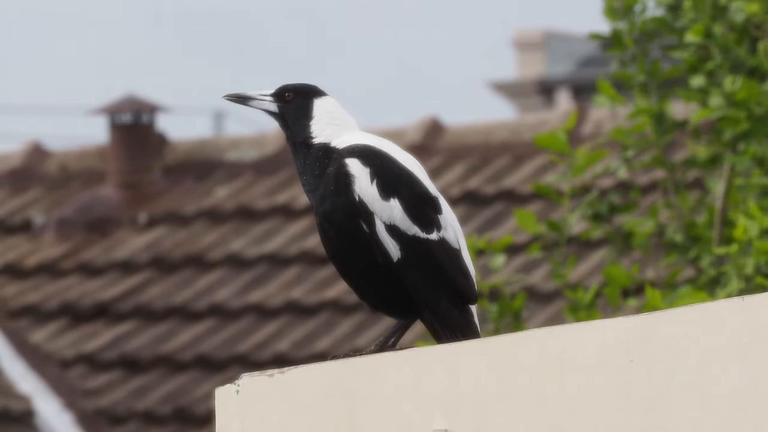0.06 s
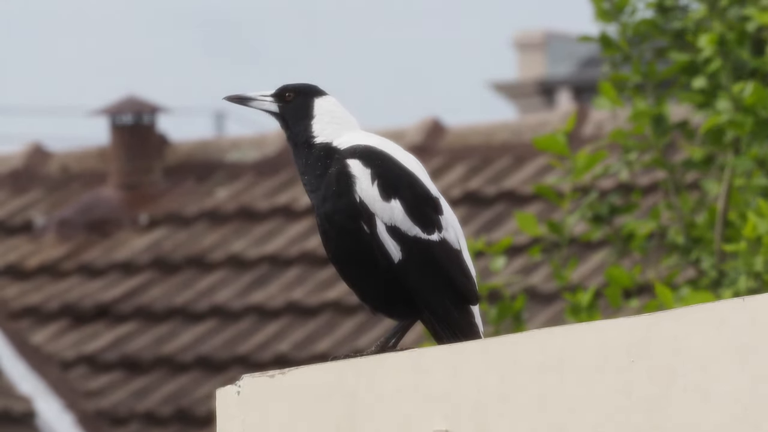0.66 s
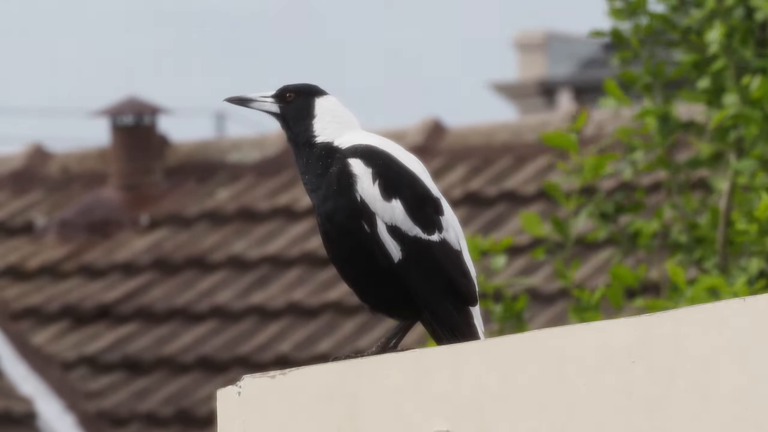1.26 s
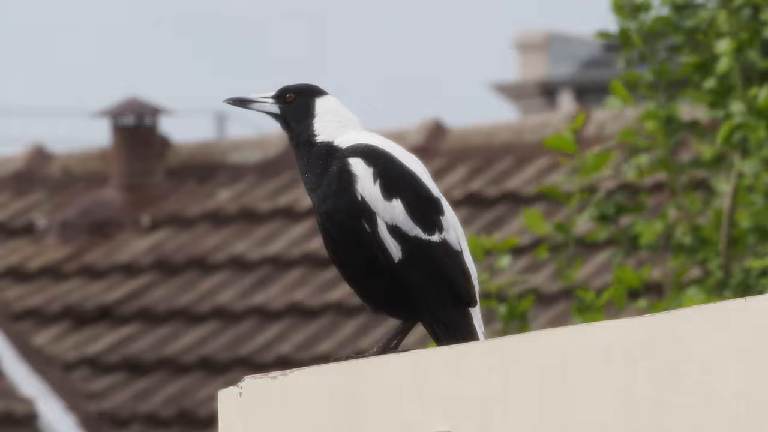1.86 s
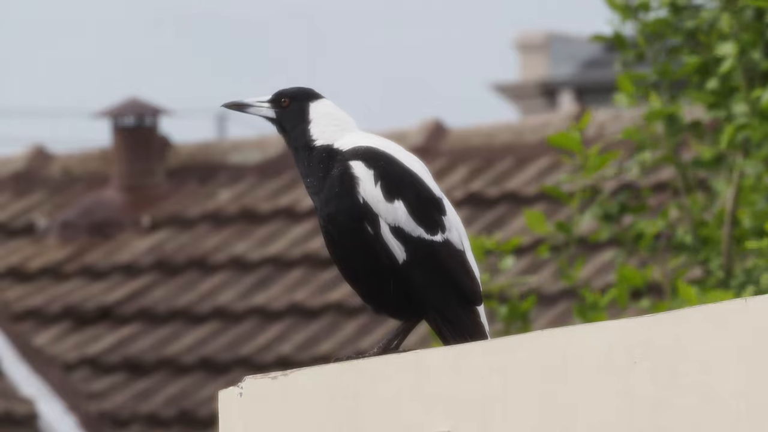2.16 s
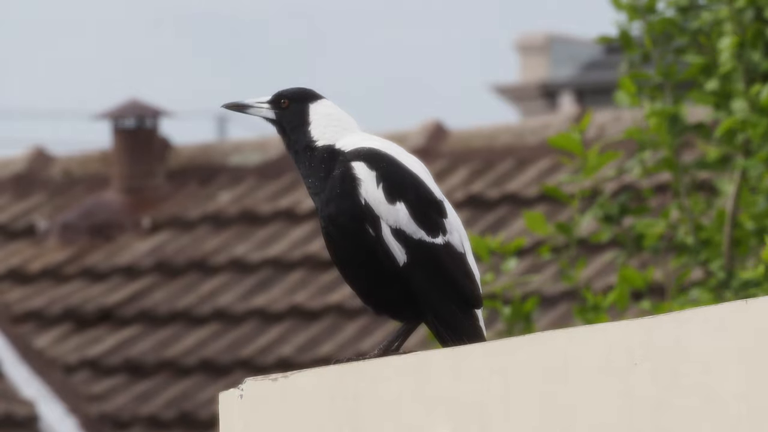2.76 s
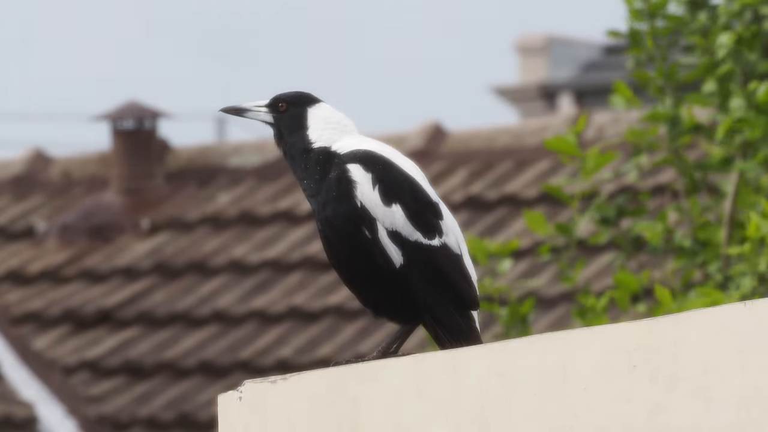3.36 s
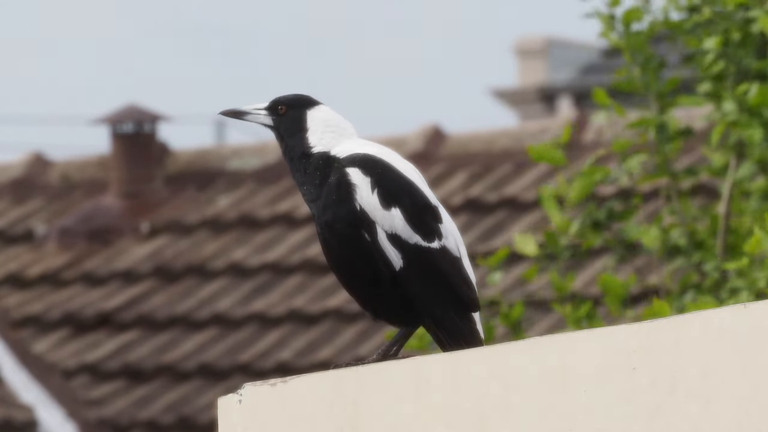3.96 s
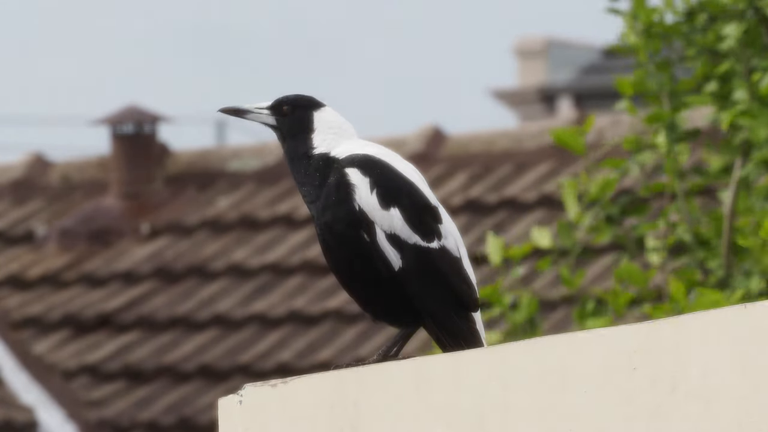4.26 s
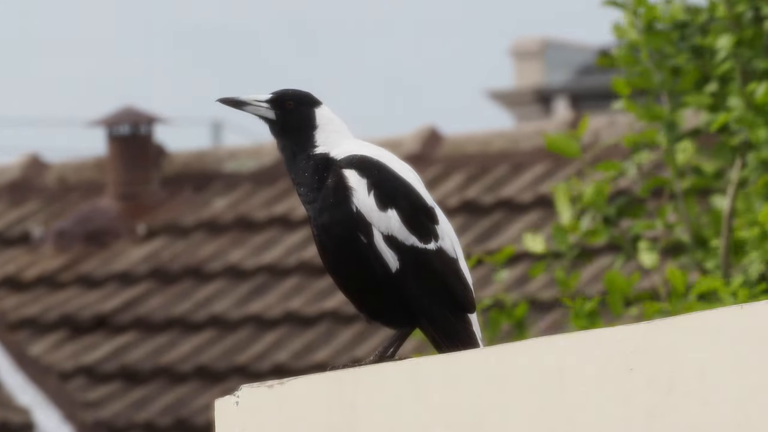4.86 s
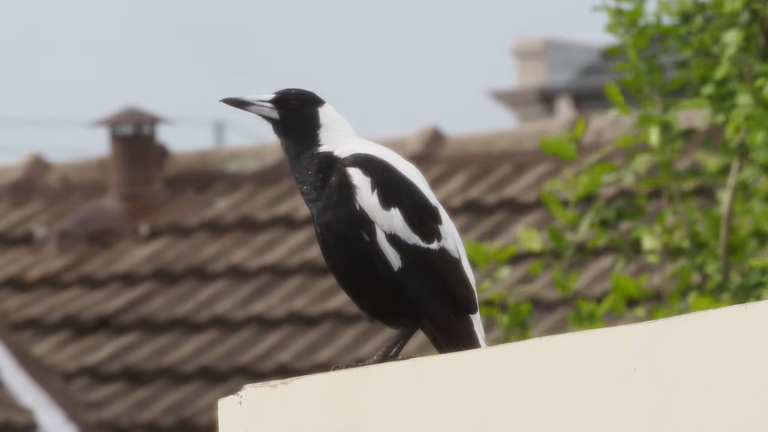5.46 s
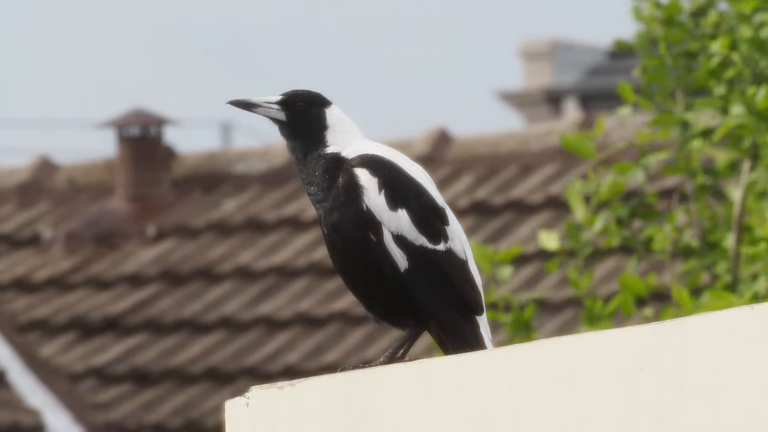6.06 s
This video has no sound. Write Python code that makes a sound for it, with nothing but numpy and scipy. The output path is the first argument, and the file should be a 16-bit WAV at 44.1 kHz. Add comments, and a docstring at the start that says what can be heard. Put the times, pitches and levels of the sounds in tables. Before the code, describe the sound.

Against a low, distant town rumble and faint hiss, a magpie calls in short separate notes. A falling whistle comes first, followed by soft yips and squawks, quick rising whistles, low hoots and a rough two-toned growl. Two sharp barks end the calls, leaving only the background. Nearby walls add a light, short echo to each note.

```python
"""Magpie on a garden wall

A magpie sings with both sides of its syrinx: a brief squawk and a falling whistle, soft yips and squawks,
rising whistles that break into low hoots, a two-voiced growl, two sharp barks. Roofs and walls answer
each note. Behind it lie a distant town rumble, a far machine's hum that fades away and a faint hiss."""
import sys
import numpy as np
from scipy import signal
from scipy.fft import rfft, irfft, next_fast_len
from scipy.io import wavfile
from scipy.ndimage import uniform_filter1d, map_coordinates

SR = 44100
rng = np.random.default_rng(int(sys.argv[2]) if len(sys.argv) > 2 else 0)


def unload_audio(sound):
    """Save the sound as a 16-bit wav file, at the path given as the first command line argument."""
    columns = np.transpose(np.atleast_2d(sound))
    # keep every value between -1 and 1, then stretch to whole-number steps
    steps = np.round(np.clip(columns, -1, 1) * 32767)
    wavfile.write(sys.argv[1], SR, steps.astype(np.int16))


N = 274302

# Tone colour of the overtones: the bird's voice plus the microphone's dip near 6.4 kHz and peak near
# 8.7 kHz. Each row: frequency in Hz, gain in dB.
OVERTONE_COLOUR_DB = [(1200, 22), (2600, 6.5), (3800, 1.5), (5100, 7), (6400, -34), (7600, -17.5),
                      (8700, 7), (10000, -25), (11400, -3), (15500, -19)]
# Air rasping through the open bill. Each row: frequency in Hz, relative density in dB.
RASP_DB = [(900, -1), (2000, 10), (3800, -5), (4900, 1), (6400, -6), (7800, -1.5), (8800, 6.5),
           (10200, -1.5), (11400, 4), (12600, -9), (15600, -14)]
# Airway resonances. Each row: centre in Hz, width in Hz, gain in dB.
AIRWAY_PEAKS = [(4980, 400, -3), (9380, 300, 0), (10850, 400, -8), (13250, 520, -1)]
# Hoarse glides. Each row: start and end in seconds, start and end pitch in Hz, relative level in dB.
SQUAWK_NOTES = [(0, .022, 1530, 1590, -45), (1.918, 1.935, 700, 670, -45), (2.054, 2.07, 850, 808, -47.5)]
# Thin glides. Each row: start and end in seconds, start and end pitch in Hz, relative level in dB.
SQUEAK_NOTES = [(0, .035, 1780, 1820, -49), (4.4, 4.412, 2300, 2700, -49), (4.568, 4.579, 3040, 5800, -54),
                (4.587, 4.598, 4250, 3300, -50)]
# Roof and wall reflections. Each row: delay in seconds, gain in dB.
WALL_ECHOES = [(.008, -17), (.022, -15), (.04, -18), (.064, -20)]
# Yard reverberation. Each row: frequency in Hz, T60 in seconds.
YARD_T60_S = [(500, 0.12), (2000, 0.35), (5000, 0.24), (12000, 0.36)]
# Background stereo likeness. Each row: frequency in Hz, left-right correlation.
CORRELATION = [(60, 0.98), (110, 0.93), (200, 0.92), (380, 0.91), (700, 0.75), (1290, 0.81), (2380, 0.018),
               (4400, -0.39), (8120, 0.95), (15000, 0.87)]
# Background balance. Each row: frequency in Hz, left minus right in dB.
BALANCE_DB = [(100, 0), (700, -1), (4400, 1), (8100, -1.5), (15000, -7.5)]
# Town rumble over time. Each row: time in seconds, level in dB.
RUMBLE_LEVEL_DB = [(0.0, -44.5), (0.74, -46.5), (1.51, -42.5), (1.57, -48.5), (2.49, -45), (2.51, -47),
                   (4.69, -44.5), (5.94, -46), (6.1, -40.5), (6.22, -44)]
# Spectra of town rumble, town wash and hiss. Each row: frequency in Hz, relative density in dB.
RUMBLE_SPECTRUM_DB = [(10, -30.5), (27, 2), (38, -8), (54, 0), (85, -10), (140, -16.5), (300, -57.5)]
WASH_SPECTRUM_DB = [(70, -16), (170, -0.5), (280, -3.5), (380, -10), (570, -10.5), (700, -7.5), (1150, -7),
                    (1320, -12.5), (1600, -11.5), (2200, -16), (3500, -24), (7000, -44)]
HISS_SPECTRUM_DB = [(2000, -7.5), (3800, -2.5), (4800, 1.5), (5500, -0.5), (6300, -11), (7200, -6),
                    (7900, -1.5), (8700, -2.5), (10000, -8), (11400, -6), (13200, -8.5), (15600, -19)]
# Whistles. Each row: start, leap and end in seconds, pitch at start, before leap, after leap and at end
# in Hz, relative level in dB, attack and release in seconds.
WHISTLE_NOTES = [ (0.275, 0.297, 0.4, 2134, 2750, 2150, 1891, -32, 0.028, 0.012),
                 (2.445, 2.497, 2.53, 1431, 1537, 1768, 1825, -32, 0.0053, 0.025),
                 (2.651, 2.679, 2.74, 1126, 1260, 1435, 1585, -33, 0.0055, .002),
                 (2.733, 2.744, 2.768, 1558, 1374, 875, 650, -26.5, 0.0022, 0.024), ]
# Yips. Each row: start, leap and end in seconds, pitch at start, before leap, after leap and at end
# in Hz, relative level in dB, octave over fundamental in dB.
YIP_NOTES = [(1.871, 1.903, 1.912, 1160, 1360, 900, 760, -40, 5),
             (2.073, 2.088, 2.108, 1250, 1330, 1140, 1120, -41.5, 13)]
# Hoots. Each row: start, leap and end in seconds, start, pre-leap, held and closing pitch in Hz,
# relative level in dB.
HOOT_NOTES = [ (2.868, 2.889, 2.971, 1460, 1200, 685, 606, -27),
              (3.12, 3.143, 3.223, 370, 470, 597, 567, -29), (3.36, 3.402, 3.47, 410, 540, 655, 575, -27), ]
# Growl, one curve per side of the syrinx. Each row: time in seconds, pitch in Hz.
GROWL_LOW_HZ = [(3.718, 605), (3.75, 650), (3.77, 620), (3.798, 592), (3.814, 680), (3.842, 630)]
GROWL_HIGH_HZ = [(3.712, 839), (3.732, 906), (3.748, 1025), (3.764, 749), (3.776, 876), (3.792, 769),
                 (3.84, 900)]
# Barks. Each row: start, crack and end in seconds, relative level, overtones and rasp in dB.
BARK_NOTES = [(4.387, 4.409, 4.461, -31, -19, -19), (4.572, 4.593, 4.643, -33, -10, -12)]

TOP_HZ = 15720


def amp(db):
    """Decibels to gain."""
    return 10 ** (np.asarray(db) / 20)


def unit(x):
    """x at rms 1."""
    return x / np.sqrt(np.mean(x ** 2) + 1e-20)


def along(points, hz):
    """(Hz, value) points read on a log axis."""
    f, v = np.transpose(points)
    return np.interp(np.log(hz + 1), np.log(f + 1), v)


def curve(points, t):
    """(Seconds, value) points read at times t."""
    return np.interp(t, *np.transpose(points))


def wobble(rate_hz, size):
    """Smooth random curve, rate_hz knots a second."""
    knots = rng.standard_normal(int(size * rate_hz / SR) + 4)
    return map_coordinates(knots, [np.arange(size) * rate_hz / SR])


def filtered(x, response):
    """x times a response over frequency."""
    size = x.shape[-1]
    padded = next_fast_len(size + 8192)
    return irfft(rfft(x, padded) * response(np.fft.rfftfreq(padded, 1 / SR)), padded)[..., :size]


def stereo_noise(spectrum):
    """Coloured noise at rms 1: near mono in the bass, stronger on the right in the treble."""
    angle = lambda hz: np.arccos(np.clip(along(CORRELATION, hz), -1, 1)) / 2
    colour = lambda hz: amp(along(spectrum, hz)) * [np.cos(angle(hz)), np.sin(angle(hz))]
    mid, side = filtered(rng.standard_normal((2, N)), colour)
    balance = lambda hz: amp(np.outer([.5, -.5], along(BALANCE_DB, hz)))
    return unit(filtered(np.array([mid + side, mid - side]), balance))


def span(start, end, margin_s=.004):
    """Sample times of a note, with room for soft edges."""
    return np.arange(round((start - margin_s) * SR), round((end + margin_s) * SR)) / SR


def leap(t, when, before, after, leap_s):
    """Smooth step between two values."""
    return before + (after - before) * (1 + np.tanh((t - when) / leap_s)) / 2


def contour(start, when, end, start_hz, before_hz, after_hz, end_hz, leap_s):
    """Times and pitch of two straight glides joined by a leap."""
    t = span(start, end)
    first_hz = np.interp(t, [start, when], [start_hz, before_hz])
    second_hz = np.interp(t, [when, end], [after_hz, end_hz])
    return t, leap(t, when, first_hz, second_hz, leap_s)


def swell_db(t, attack_s, release_s, depth_db=22):
    """Effort builds, holds and lets go."""
    return -depth_db * (np.exp((t[0] - t) / attack_s) + np.exp((t - t[-1]) / release_s))


def syrinx(t, hz, rough, edge_s=.0046, flutter_hz=330, jitter=.0566, shimmer_db=8):
    """One vibrating membrane: pitch, phase and gate. Fast sweeps make it flutter more."""
    hz = uniform_filter1d(hz, size=130)  # muscles round off each turn
    octaves_per_s = np.abs(np.gradient(np.log2(hz))) * SR
    rough = rough + np.minimum(octaves_per_s / 150, .45)
    hz = hz * (1 + rough * jitter * wobble(flutter_hz, len(t)))
    ramp = np.clip(np.minimum(t - t[0], t[-1] - t) / edge_s, 0, 1)
    flutter = amp(rough * shimmer_db * np.tanh(wobble(flutter_hz, len(t))))
    return hz, 2 * np.pi * np.cumsum(hz) / SR, np.sin(np.pi / 2 * ramp) ** 2 * flutter


def note(t, hz, level_db, octave_db, overtones_db, rasp_db, wheeze_db, rough, odd_db=0):
    """The throat favours the fundamental or its octave; weaker overtones and air noise ride on them."""
    hz, phase, gate = syrinx(t, hz, rough)
    octave = amp(octave_db) * np.sin(2 * phase + rng.uniform(0, 2 * np.pi))
    tone = (np.sin(phase) + octave) / np.hypot(1, amp(octave_db))
    k = np.arange(3, 20)[:, None]
    rolloff_db = .33 * overtones_db * np.log2(k)  # softer closure, steeper fall
    weights = amp(along(OVERTONE_COLOUR_DB, k * hz) + rolloff_db + odd_db * (k % 2)) * (k * hz < TOP_HZ)
    overtones = unit(np.sum(weights * np.sin(k * phase + rng.uniform(0, 2 * np.pi, k.shape)), axis=0))
    puffs = rng.standard_normal((2, len(t))) * (1 + .6 * np.sin(phase))  # one puff of air a cycle
    rasp = unit(filtered(puffs[0], lambda f: amp(along(RASP_DB, f))))
    airway = lambda f: sum(amp(db) / (1 + (2 * (f - centre_hz) / width_hz) ** 2)
                           for centre_hz, width_hz, db in AIRWAY_PEAKS)
    wheeze = unit(filtered(puffs[1], airway))
    upper = amp(overtones_db) * overtones + amp(rasp_db) * rasp + amp(wheeze_db) * wheeze
    return t, gate * amp(level_db) * (np.sqrt(2) * tone + upper)


def second_voice(t, hz, level_db, rough):
    """The other side of the syrinx: a plain, unsteady tone."""
    _, phase, gate = syrinx(t, hz, rough)
    return t, np.sqrt(2) * gate * amp(level_db) * np.sin(phase)


def squawks():
    """Brief hoarse glides from a fluttering membrane."""
    for start, end, start_hz, end_hz, level_db in SQUAWK_NOTES:
        t = span(start, end)
        yield note(t, np.linspace(start_hz, end_hz, len(t)), level_db, octave_db=-10.5,
                   overtones_db=-7.5, rasp_db=-12.5, wheeze_db=-28, rough=.76)


def squeaks():
    """Thin second-voice glides over the first squawk and the barks."""
    for start, end, start_hz, end_hz, level_db in SQUEAK_NOTES:
        t = span(start, end)
        yield second_voice(t, np.linspace(start_hz, end_hz, len(t)), level_db, rough=.35)


def yard(song, tail_db=-14, build_s=.016, scatter_s=.0052, spread=.64, lowpass_hz=4500):
    """Roofs and walls return smeared reflections and a diffuse, dulled tail."""
    hz, t, noise = signal.stft(rng.standard_normal((2, SR * 3 // 4)), SR, nperseg=256)
    fade = amp(-60 * t / along(YARD_T60_S, hz)[:, None]) * (1 - np.exp(-t / build_s))
    tail = signal.istft(noise * fade, SR, nperseg=256)[1]
    bass_energy = np.mean(fade[0] ** 2) * tail.shape[1]
    response = amp(tail_db) * tail / np.sqrt(bass_energy)
    age_s = np.arange(tail.shape[1]) / SR
    for delay_s, db in WALL_ECHOES:
        burst = np.exp(-np.abs(age_s - delay_s) / scatter_s) * (age_s >= delay_s)
        response += amp(db) * burst / np.linalg.norm(burst) * rng.standard_normal(tail.shape)
    mid, side = signal.fftconvolve(song[None], response, axes=1)[:, :N]
    stereo = np.array([mid + spread * side, mid - spread * side])
    return filtered(stereo, lambda f: 1 / np.hypot(1, f / lowpass_hz))


def town(wash_db=-49):
    """Distant town: low rumble under a wavering midrange wash."""
    rumble_db = curve(RUMBLE_LEVEL_DB, np.arange(N) / SR)
    rumble = amp(rumble_db + .1 * wobble(6.9, N)) * stereo_noise(RUMBLE_SPECTRUM_DB)
    wash = amp(wash_db + 1.4 * wobble(6.6, N)) * stereo_noise(WASH_SPECTRUM_DB)
    return rumble + wash


def machine_hum(pitch_hz=205.3, drift_hz=1.73, level_db=-51, hold_s=1.0, fade_db_per_s=93):
    """A far machine: one wavering tone that holds, then fades."""
    t = np.arange(N) / SR
    phase = 2 * np.pi * np.cumsum(pitch_hz + drift_hz * wobble(7.1, N)) / SR
    return np.sqrt(2) * amp(level_db - fade_db_per_s * np.maximum(t - hold_s, 0)) * np.sin(phase)


def hiss(level_db=-60):
    """Steady microphone hiss."""
    return amp(level_db) * stereo_noise(HISS_SPECTRUM_DB)


def whistles(brighten_db_per_octave=22):
    """Nearly pure notes; the octave grows with pitch."""
    for *shape, level_db, attack_s, release_s in WHISTLE_NOTES:
        t, hz = contour(*shape, leap_s=.005)
        octave_db = -27 + brighten_db_per_octave * np.log2(hz / 1500)
        yield note(t, hz, level_db + swell_db(t, attack_s, release_s), octave_db,
                   overtones_db=-29.5, rasp_db=-32, wheeze_db=-46, rough=.22)


def yips():
    """Soft reedy notes, strong in even harmonics, that rise and step down."""
    for *shape, level_db, octave_db in YIP_NOTES:
        t, hz = contour(*shape, leap_s=.006)
        yield note(t, hz, level_db + swell_db(t, attack_s=.0045, release_s=.011), octave_db,
                   overtones_db=-9, rasp_db=-14, wheeze_db=-29, rough=.26, odd_db=-9.5)


def register_db(hz, break_hz=597, db_per_hz=.65):
    """Octave over fundamental; the octave takes over below break_hz."""
    return np.clip((break_hz - hz) * db_per_hz, -20.5, 9.5)


def hoots(closing_s=.023, flip_db=13, falter_db=5, falter_s=.0059):
    """Low notes leap to a held pitch, then dip and flip to the octave, faltering at each change."""
    for start, when, end, start_hz, before_hz, held_hz, closing_hz, level_db in HOOT_NOTES:
        t, hz = contour(start, when, end, start_hz, before_hz, held_hz, held_hz, leap_s=.007)
        flip = end - closing_s
        hz = leap(t, flip, hz, closing_hz, leap_s=.0075)
        octave_db = register_db(hz) + leap(t, flip, 0, flip_db, leap_s=.0032)
        dip_db = falter_db * sum(np.exp(-((t - change) / falter_s) ** 2) for change in (when, flip))
        effort_db = level_db - dip_db + swell_db(t, attack_s=.023, release_s=.0043)
        yield note(t, hz, effort_db, octave_db, overtones_db=-27, rasp_db=-27, wheeze_db=-35, rough=.14)


def growl(low_db=-30.5, high_db=-28, octave_lift_db=7):
    """Both sides of the syrinx sound at once; their unrelated pitches beat."""
    t = span(GROWL_LOW_HZ[0][0], GROWL_LOW_HZ[-1][0])
    hz = curve(GROWL_LOW_HZ, t)
    effort_db = low_db + swell_db(t, attack_s=.023, release_s=.0077)
    yield note(t, hz, effort_db, register_db(hz) + octave_lift_db,
               overtones_db=-23, rasp_db=-31, wheeze_db=-32, rough=.31)
    t = span(GROWL_HIGH_HZ[0][0], GROWL_HIGH_HZ[-1][0])
    effort_db = high_db + swell_db(t, attack_s=.015, release_s=.034)
    yield second_voice(t, curve(GROWL_HIGH_HZ, t), effort_db, rough=.7)


def barks(start_hz=2070, rise_hz_per_s=98000, landing_hz=1200, settled_hz=710, settle_s=.025):
    """A thin rising chirp cracks down into a loud, raspy note, filling out as the pitch falls."""
    for start, crack, end, level_db, overtones_db, rasp_db in BARK_NOTES:
        t = span(start, end)
        chirp_hz = start_hz + rise_hz_per_s * (t - start)
        body_hz = settled_hz + (landing_hz - settled_hz) * np.exp(-np.maximum(t - crack, 0) / settle_s)
        hz = leap(t, crack, chirp_hz, body_hz, leap_s=.005)
        thinness = np.clip((hz - settled_hz) / (start_hz - settled_hz), 0, 1)
        effort_db = level_db - 14 * thinness + swell_db(t, attack_s=.0046, release_s=.007)
        octave_db = -3 - 14 * thinness
        yield note(t, hz, effort_db, octave_db, overtones_db, rasp_db, wheeze_db=-29, rough=.55)


def magpie():
    """All notes on one mono track."""
    song = np.zeros(N)
    for call in (squawks, squeaks, whistles, yips, hoots, growl, barks):
        for t, sound in call():
            index = np.round(t * SR).astype(int)
            inside = (index >= 0) & (index < N)
            song[index[inside]] += sound[inside]
    return song


def scene(bird_db=-.5, pan_db=.7):
    """Bird and echoes slightly right of centre, over the background."""
    song = amp(bird_db) * magpie()
    bird = (song + yard(song)) * amp([[-pan_db], [pan_db]])
    return bird + town() + machine_hum() + hiss()


def record(dry):
    """Brick-wall low-pass at TOP_HZ."""
    return filtered(dry, lambda hz: hz < TOP_HZ)


dry = scene()
out = record(dry)
unload_audio(out)
```